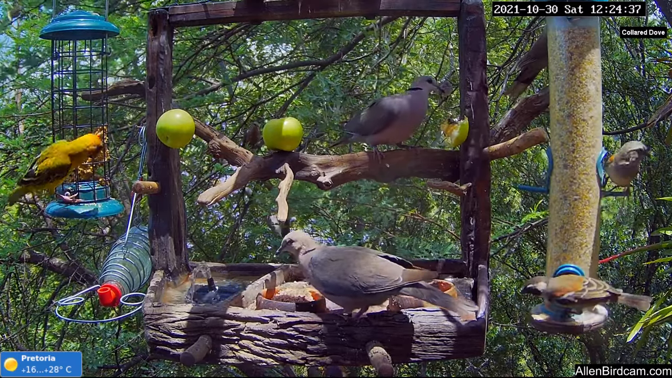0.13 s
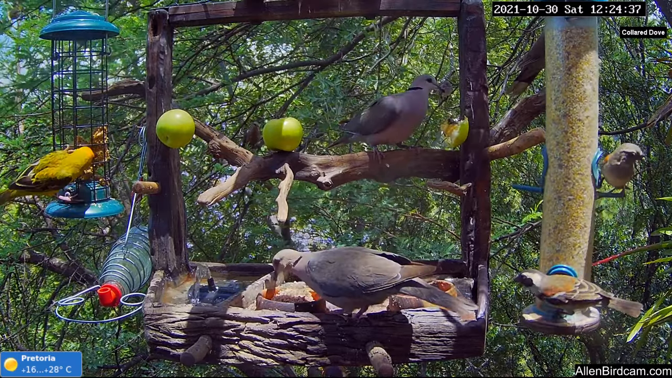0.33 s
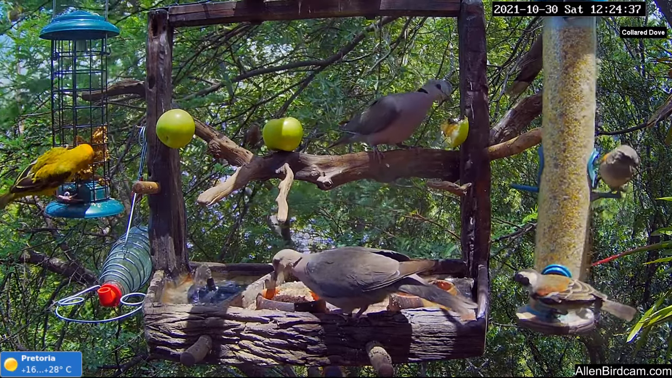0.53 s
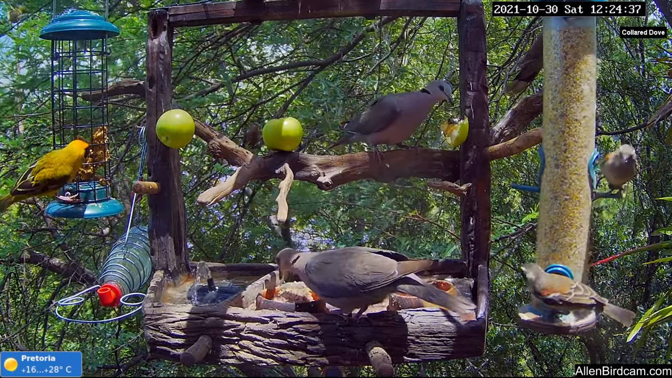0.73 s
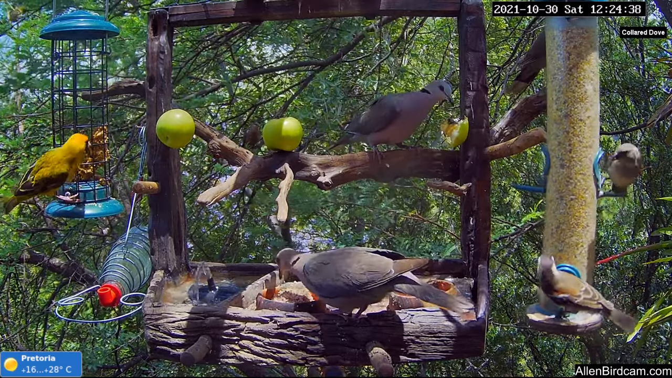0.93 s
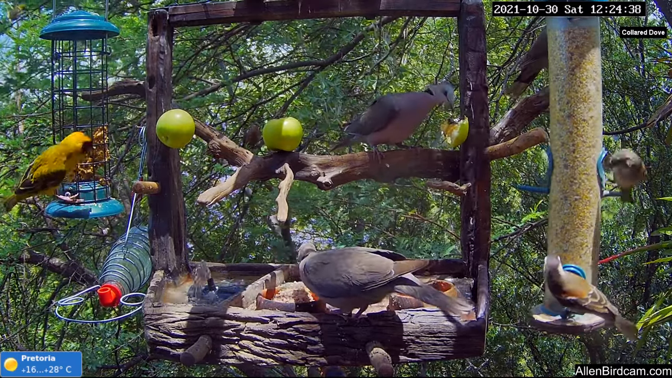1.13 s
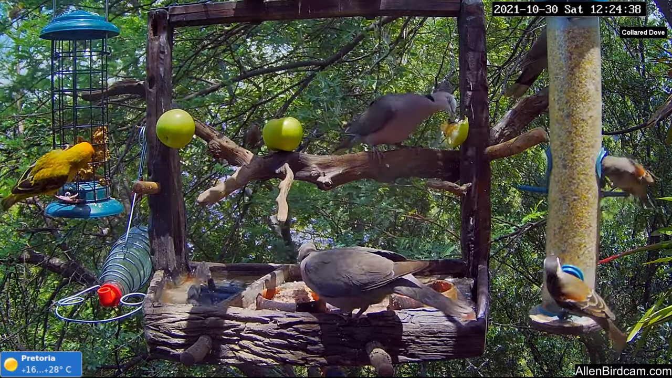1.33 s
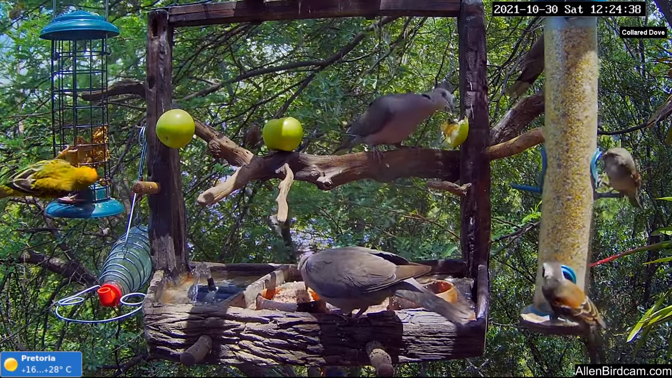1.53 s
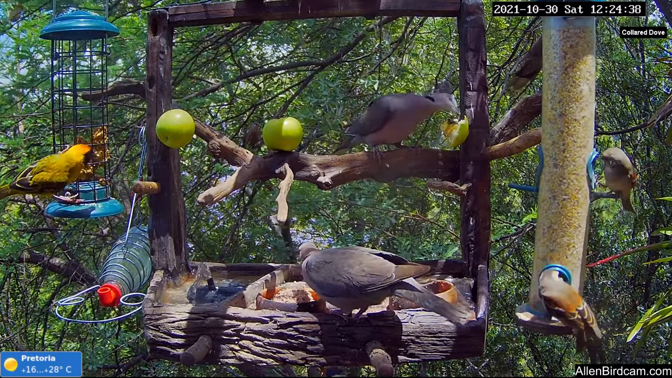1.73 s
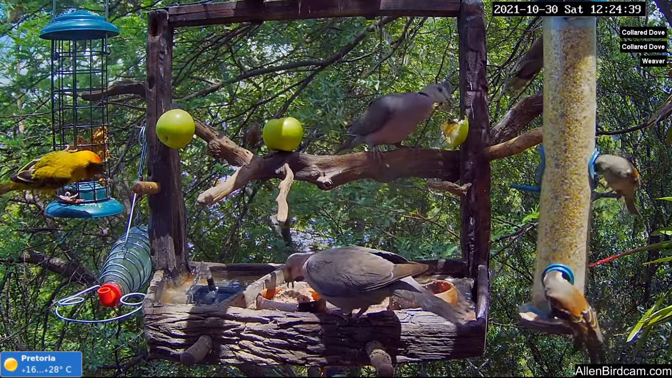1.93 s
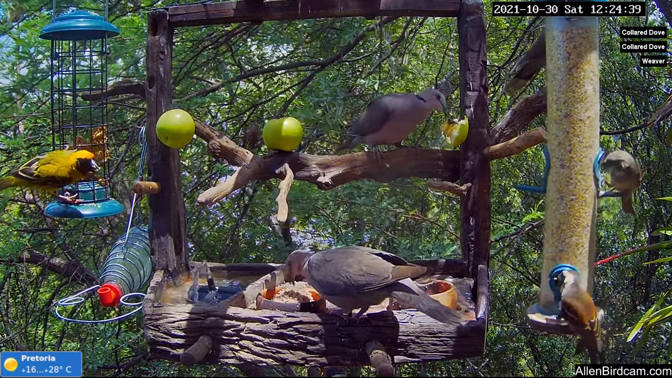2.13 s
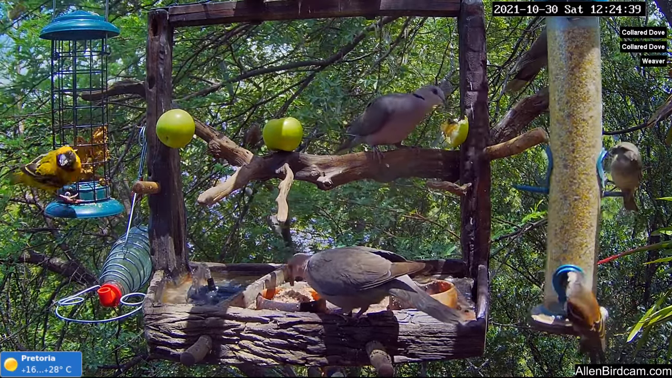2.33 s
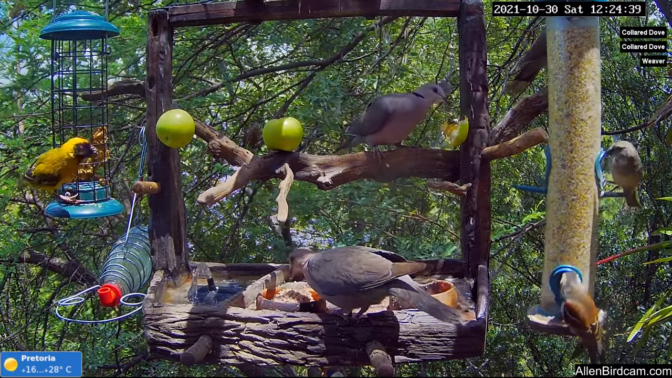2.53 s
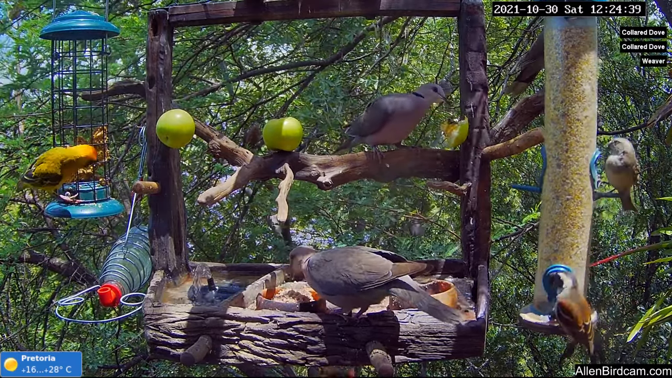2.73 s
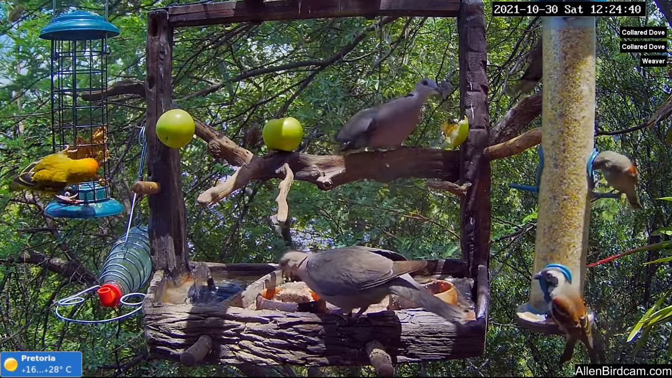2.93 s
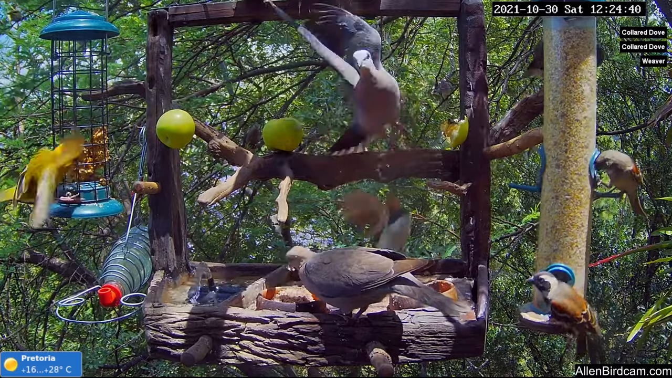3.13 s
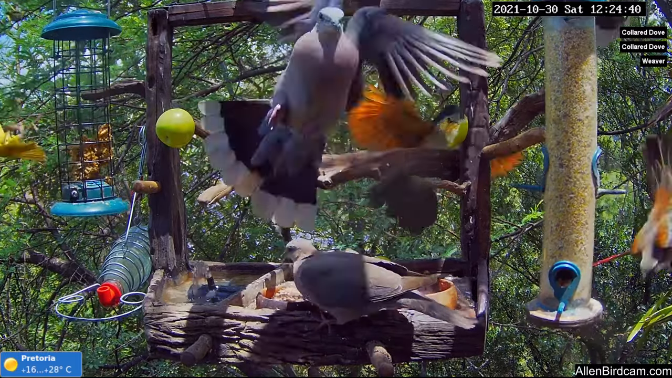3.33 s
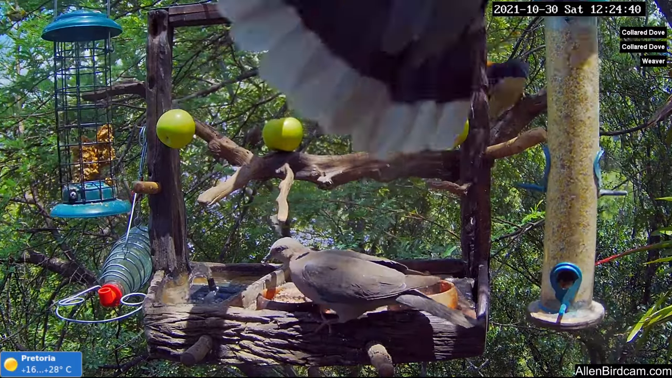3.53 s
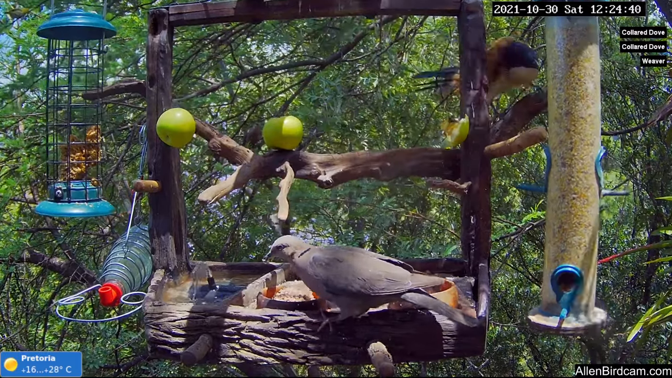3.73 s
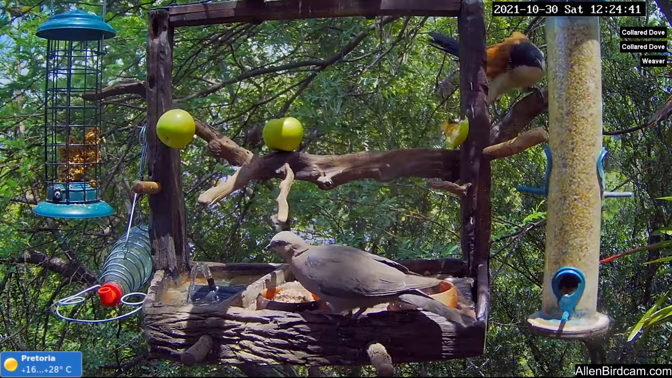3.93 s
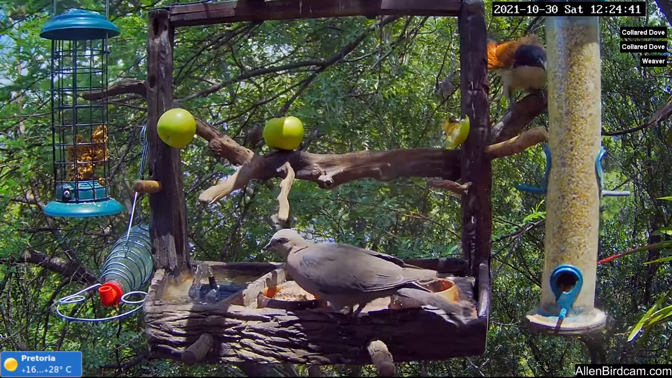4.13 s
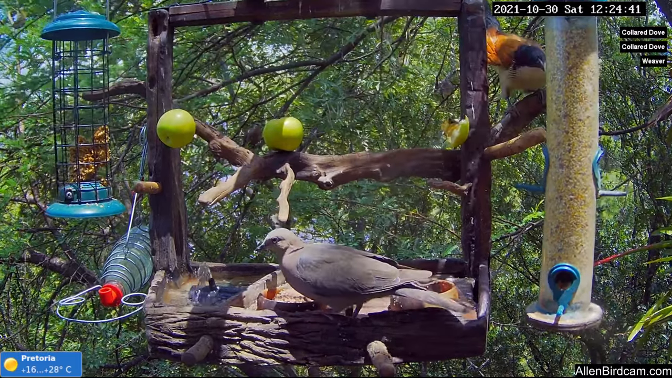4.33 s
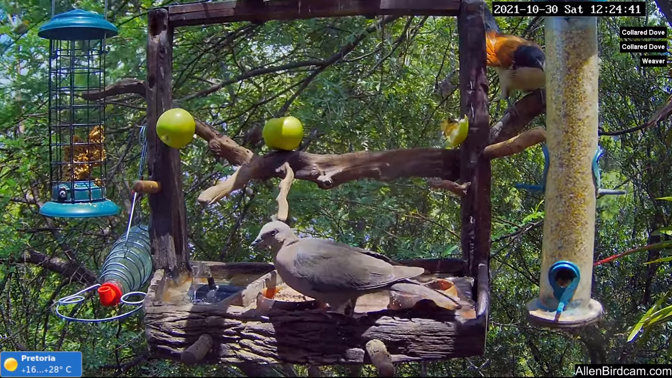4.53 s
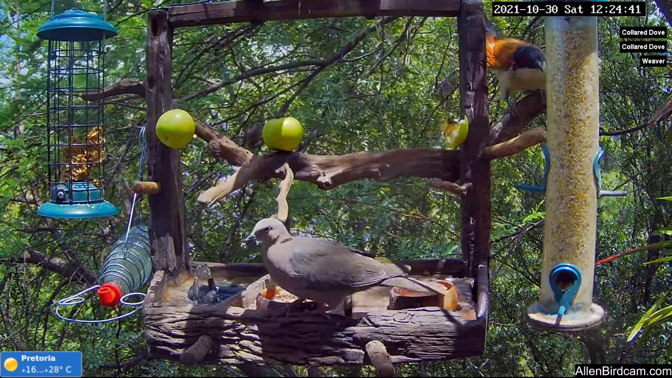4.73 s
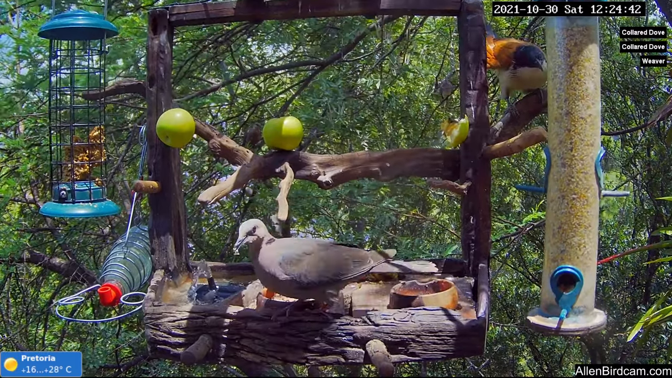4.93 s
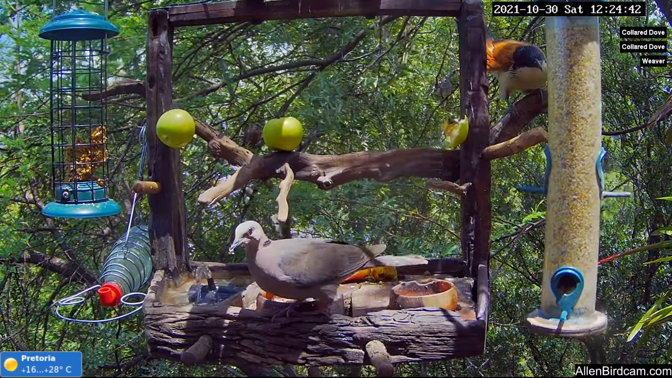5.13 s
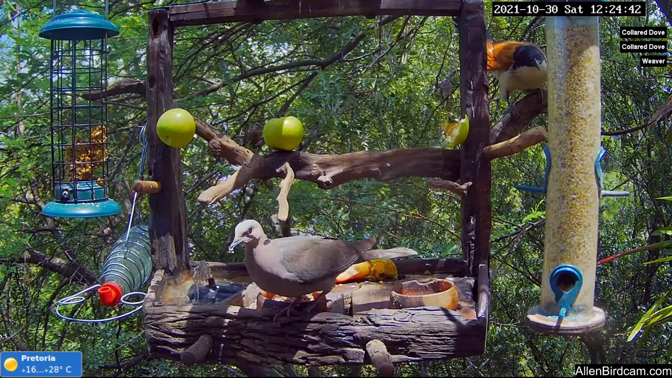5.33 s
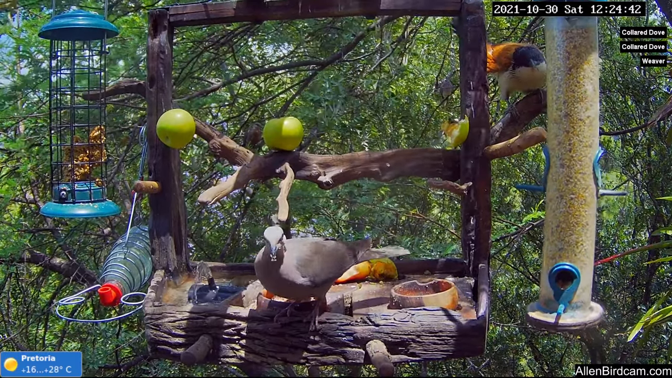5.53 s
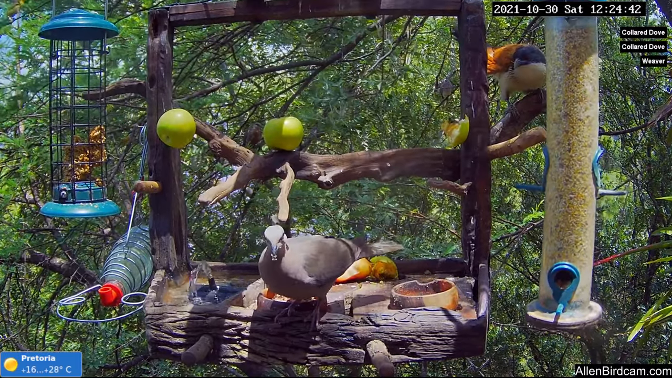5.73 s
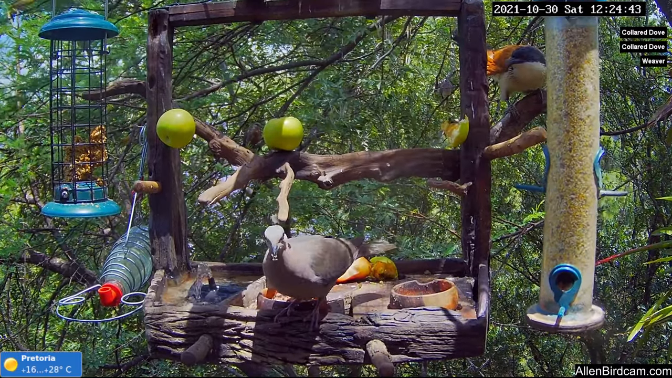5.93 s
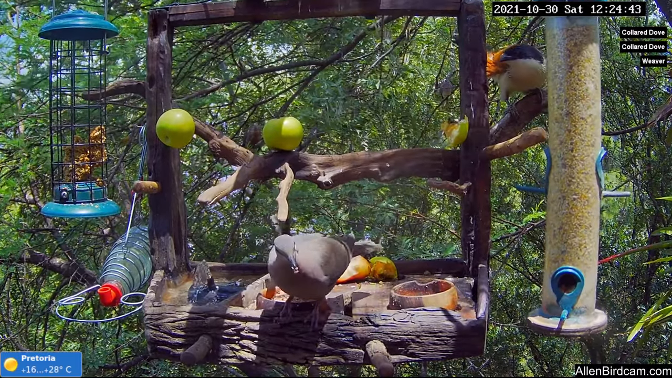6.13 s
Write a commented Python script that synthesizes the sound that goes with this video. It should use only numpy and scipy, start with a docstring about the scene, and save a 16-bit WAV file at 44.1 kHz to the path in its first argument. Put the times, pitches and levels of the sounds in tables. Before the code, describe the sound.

Beaks crack seed at a garden feeder, then birds burst away in clapping, whooshing wingbeats that thump the microphone, leaving pecks and faint chirps.

```python
"""A garden feeder: beaks crack seed and tap the tray over a light breeze on the microphone and far traffic.
The flock bursts off in whooshing, rustling, clapping noise; a dove passes so close that its wing eddies,
two-sided pressure swings, overload the converter. Birds whistle (gliding sines) and scold
(sines roughened at half their pitch, with breath noise). Echoes are noise tails.
"""
import sys
import numpy as np
from scipy import signal
from scipy.fft import rfft, irfft, next_fast_len
from scipy.io import wavfile
from scipy.ndimage import uniform_filter1d, map_coordinates

SR = 44100
rng = np.random.default_rng(int(sys.argv[2]) if len(sys.argv) > 2 else 0)


def wrap_up_sound(samples):
    """Save the sound to the file named by the first command line argument, as 16-bit audio."""
    columns = np.atleast_2d(samples).T
    # keep every value between -1 and 1, then stretch to whole-number steps
    tamed = np.clip(columns, -1, 1)
    steps = np.round(tamed * 32767).astype(np.int16)
    wavfile.write(sys.argv[1], SR, steps)


N = 273420
T = np.arange(N) / SR


def pecks():
    """A cracked husk rings in the modes nearest its brightest pitch; ticks are dry; taps ring the tray."""
    # beaks cracking seed: start_s, peak_db, brightest_hz
    crack_rows = [(0.2795, -50.5, 9700), (0.5091, -49, 5500), (0.519, -34.5, 5970), (0.6968, -53, 5640),
                  (0.9857, -47.5, 7300), (1.1452, -51, 6750), (1.4391, -44.5, 5500), (1.467, -58, 4880),
                  (1.726, -56, 6800), (1.9093, -43, 5700), (2.0027, -57, 7900), (2.3835, -50, 6200),
                  (2.4452, -30, 6370), (2.5401, -58.5, 5963), (2.6093, -55, 5600), (2.9974, -48, 7000),
                  (3.2532, -47.5, 9000), (4.0108, -48.5, 5240), (4.1173, -48.5, 7340), (4.6808, -47, 5100),
                  (4.744, -57, 4200), (4.8406, -55.5, 5730), (4.9503, -56.5, 4720), (5.074, -54.5, 6800),
                  (5.2974, -39.5, 7900), (5.6255, -17.5, 6230)]
    # husk modes: mode_hz, relative_db
    husk_modes = [(4300, 9), (5350, 13), (6300, 6.5), (7000, 8), (7800, 4), (9400, -0.5), (11500, -12.5)]
    # seeds and husks ticking on the boards: start_s, peak_db
    tick_rows = [(0.8, -54), (1.0705, -54), (1.0894, -62), (1.3877, -60), (2.2098, -60), (4.9036, -56.5),
                 (5.439, -56), (5.8155, -55), (5.946, -62)]
    # beaks and feet on the tray: start_s, ring_hz, level_db
    tap_rows = [(.3, 1090, -53), (.665, 716, -41.5), (2.91, 586, -46.5), (3.246, 1100, -48),
                (4.217, 2680, -53), (4.412, 748, -41), (4.693, 2280, -48.5), (5.815, 2420, -58)]
    # brittle click kernel, brightest near 6 kHz: amplitude per sample
    click_kernel = np.array([1, 3, 2, -2, -3, -1]) / 5
    husk_t60_s, give_way_s, tick_t60_s = 0.012, 0.00099, 0.0025

    out, t = np.zeros(N), T[:SR // 10]
    # distant beaks patter at random: start_s, peak_db, brightest_hz
    faint = rng.random((150, 3)) * [N / SR, 10, 5000] + [0, -78, 4500]
    for s, peak_db, bright_hz in [*crack_rows, *faint]:
        chance = rng.standard_normal(len(husk_modes) + 64)
        ring = np.zeros(len(t))
        for (hz, mode_db), level_chance, pitch_chance in zip(husk_modes, chance, chance[::-1]):
            octaves_off = np.log2(hz / bright_hz)
            gain = amp(mode_db + 2.5 * level_chance - 65 * octaves_off ** 2)
            ring += gain * np.sin(2 * np.pi * hz * (1 + .045 * pitch_chance) * t)
        ring *= amp(-60 * t / husk_t60_s) * np.tanh(t / give_way_s) ** 2
        snap = np.convolve(chance[-64:], click_kernel, 'same') * np.hanning(64)
        ring[:64] += 0.13 * snap
        add(out, s, amp(peak_db) * ring / np.abs(ring).max())

    # random ticks: start_s, peak_db
    stray = rng.random((120, 2)) * [N / SR, 10] + [0, -72]
    for s, peak_db in [*tick_rows, *stray]:
        burst = rng.standard_normal(64) * amp(-60 * t[:64] / tick_t60_s)
        tick = np.convolve(burst, click_kernel)
        add(out, s, amp(peak_db) * tick / np.abs(tick).max())

    for s, hz, level_db in tap_rows:
        decay = amp(level_db - 60 * t * hz / 40)  # 60 dB in 40 cycles
        add(out, s, decay * np.sin(2 * np.pi * hz * t) * (1 - np.exp(-t * hz / 1.1)))
    return out


def wings():
    """Air whooshes through the wings stroke by stroke, feathers rub in quick grains, tips and feet strike."""
    # beating wings, before common trims: time_s, whoosh_db, rustle_db
    beat_rows = [(3.03, -73, -85.5), (3.32, -63.5, -77), (3.4, -39.5, -57), (3.48, -38, -55),
                 (3.57, -34.5, -50), (3.68, -40, -53), (3.75, -43, -54), (3.9, -51, -61),
                 (4.08, -65.5, -86)]
    # wing tips and feet striking, before common trims: start_s, level_db, thud_relative_db, length_s
    clap_rows = [(3.265, -52, 8, 0.059), (3.35, -58, 18, 0.021), (3.508, -30.5, 5, 0.049),
                 (3.668, -25.5, 12, 0.022), (4.02, -50.5, 9.5, 0.053), (3.396, -45.5, 31, 0.014),
                 (3.4157, -24, 3.5, 0.016), (3.456, -15, 4, 0.045), (3.5318, -20.5, -5, 0.022),
                 (3.6247, -26, 6.5, 0.031), (3.7768, -22, 12, 0.016), (3.867, -26.5, -0.5, 0.043)]
    # air through the wings: freq_hz, relative_db_per_hz
    whoosh_spectrum = [(88, -48.5), (150, -14.5), (264, 0), (487, -6), (653, -5.5), (837, -9),
                       (2500, -32.5), (3250, -80), (5500, -120)]
    # feather friction: freq_hz, relative_db_per_hz
    rustle_spectrum = [(1060, -31), (1800, -3.5), (2140, -20), (2720, -6.5), (6350, -3), (11200, -14.5),
                       (15500, -48)]
    # the dove's steady stroke
    downstroke_s, strokes_per_s, stroke_db = 3.675, 9.53, 3.5

    flying = np.clip(np.minimum(T - beat_rows[0][0], beat_rows[-1][0] - T) / 0.0089, 0, 1)
    whoosh_db, rustle_db = curves(beat_rows)
    whoosh_db = whoosh_db + stroke_db * np.cos(2 * np.pi * strokes_per_s * (T - downstroke_s))
    strokes = wobble(45)  # many small wings out of step
    whoosh = rush(whoosh_spectrum, lumps_db=2.5, rate=70)
    rustle = patchy(rush(rustle_spectrum, lumps_db=2.5, rate=200), depth_db=3.5)
    out = amp(whoosh_db - 3.0 + 1.13 * strokes) * whoosh
    out += amp(rustle_db + 1.5 * strokes) * rustle

    thud = rush(whoosh_spectrum, lumps_db=1, rate=110)
    snap = patchy(rush(rustle_spectrum, lumps_db=2.0, rate=530), depth_db=2.5)
    snap_level, thud_level, t = np.zeros(N), np.zeros(N), T[:SR // 8]
    for s, db, thud_db, length in clap_rows:
        # a longer strike also swells more slowly
        add(snap_level, s, amp(db - 10.0 - 60 * t / length) * np.tanh(t / (1.4 * length ** 2)))
        thud_decay = amp(thud_db - 60 * t / (1.25 * length) + db - 5.0)
        add(thud_level, s, thud_decay * (1 - np.exp(-t / 0.0032)))
    return out * flying + snap_level * snap + thud_level * thud


def air():
    """Slow turbulence on the microphone, and two-sided pressure swings as wing eddies roll past."""
    # breeze: time_s, level_db
    breeze_rows = [(0, -36), (.3, -41.5), (.5, -30.5), (.9, -40), (1.5, -42), (1.85, -39.5), (2.25, -35),
                   (2.55, -33.5), (2.85, -48), (4.2, -34), (4.42, -35), (4.75, -41), (5.1, -44.5),
                   (5.6, -52.5), (6.2, -53.5)]
    # turbulence: freq_hz, relative_db_per_hz
    gust_spectrum = [(3.5, -36.5), (6.0, 7.5), (19, -3.5), (37, -13.5), (67, -9.5), (118, -27),
                     (250, -40.5), (320, -55), (550, -120)]
    # passing eddies: centre_s, peak_before (full scale 1), core_before_s, peak_after, core_after_s
    eddy_rows = [(3.6735, .95, .0095, -.8, .014), (3.707, -.05, .01, .24, .013),
                 (3.7828, -.9, .012, 1.9, .015), (3.803, .1, .01, -.3, .034)]
    # the dove's downwash: strongest from-to, with straight dB slopes either side
    wash_peak_db, from_s, to_s, builds_db_per_s, dies_db_per_s = -23, 3.5, 3.91, 37, 63

    under_db = np.maximum(builds_db_per_s * (from_s - T), dies_db_per_s * (T - to_s))
    wash_db = wash_peak_db - np.maximum(0, under_db)
    level = np.hypot(amp(curves(breeze_rows)[0]), amp(wash_db))
    out = level * rush(gust_spectrum, lumps_db=2.0, rate=15)
    for s, before, core_before, after, core_after in eddy_rows:
        u = np.abs(T - s) / np.where(T < s, core_before, core_after)
        swing = u / (1 + u * u) ** 3 * 216 / 25 / np.sqrt(5)  # peaks at 1
        out += np.where(T < s, before, after) * swing
    return out


def songs():
    """Gliding whistles: notes and falls tremble in level; songs pass a beak; all but falls echo."""
    # whistled notes: start_s, length_s, from_hz, to_hz, mid_bow_hz, peak_rms_db, peak_at_share
    note_rows = [(0.242, 0.15, 3770, 3290, 0, -88, 0.64), (0.329, 0.22, 2633, 2642, 108, -63, 0.098),
                 (2.229, 0.024, 4310, 4370, 0, -68, 0.51), (2.239, 0.026, 5960, 5900, -1, -59, 0.74),
                 (2.277, 0.028, 7470, 7360, 0, -63.5, .5), (2.257, 0.043, 5570, 4140, 98, -54, 0.87),
                 (2.3, 0.041, 3950, 3550, 30, -68.5, .4), (3.017, 0.11, 5260, 5200, 102, -72.5, .3),
                 (3.133, 0.082, 4820, 4520, -120, -58.5, 0.45), (5.191, 0.37, 5860, 5840, -1.5, -91, .4),
                 (5.611, 0.17, 3064, 3080, -1, -69, .2), (5.99, 0.044, 5430, 4320, -160, -68, 0.65)]
    # firm falling whistles close by as the flock leaves: start_s, length_s, from_hz, to_hz,
    # mid_bow_hz, peak_rms_db, peak_at_share
    fall_rows = [(3.577, .161, 5320, 2500, 398.5, -38, 0.14), (3.634, .126, 5600, 1600, -480, -43, .5),
                 (3.706, 0.053, 6050, 3760, 152, -45.5, .3), (3.65, 0.0342, 1080, 620, 110, -35.5, 0.86)]
    # one song, before beak and song level: start_s from its arch, length_s, from_hz, to_hz,
    # mid_bow_hz, peak_db, peak_at_share
    song_rows = [(-.083, 0.066, 2375, 1920, -31, -60.5, 0.28), (-.019, 0.022, 1850, 1820, -4, -63, 0.5),
                 (-.003, .073, 1950, 1870, 1072.5, -37, .55), (.068, .065, 1900, 1890, -590, -43.5, 0.22)]
    # songs: arch_s, level_db, silent_after_s from the arch
    song_times = [(2.83, -4.5, 0.0993), (4.256, 1.5, 0.161)]
    # open beak favouring a narrow range: freq_hz, gain_db
    beak_gain = [(1300, -29.5), (2100, -14), (2900, -3), (3700, -3.5), (4200, -29), (6000, -65)]
    # breathy puff as the arch begins
    puff_hz, puff_octaves, puff_s, puff_db = 4650, 0.17, 0.025, -64
    call_echo_db, song_echo_db = -2, -9  # the singer is nearer than the other callers
    waver = 0.015  # pitch unsteadiness as a share, before smoothing

    out, tremble = np.zeros(N), amp(5.1 * wobble(110))

    def shaky(s, call, share=1):
        """The call's level follows the shared random tremble."""
        return call * tremble[round(s * SR):][:len(call)] ** share

    def puff_band(hz):
        """A bell-shaped band on a log frequency axis."""
        return amp(-10 * (np.log2((hz + 1) / puff_hz) / puff_octaves) ** 2)

    calls = []
    for row in note_rows:
        note = whistle(contour(*row, waver=waver), smooth_s=0.0018)
        calls.append((row[0], shaky(row[0], note), call_echo_db))
    for s, db, stop in song_times:
        for row in song_rows:
            part = whistle(contour(*row, fade_db=10.5), smooth_s=.002, beak=beak_gain)
            break_off = np.clip((stop - row[0] - T[:len(part)]) / 0.017, 0, 1)
            calls.append((s + row[0], amp(db) * part * break_off, song_echo_db))
        breath = filtered(rng.standard_normal(round(puff_s * SR)), puff_band)
        puff = amp(db + puff_db) * unit(breath) * np.hanning(len(breath))
        calls.append((s, puff, call_echo_db))
    for s, call, echo_db in calls:
        padded = np.pad(call, (0, SR // 2))
        add(out, s, padded + amp(echo_db) * echo(padded, size=1.4))
    for row in fall_rows:
        fall = whistle(contour(*row, waver=waver, fade_db=13), smooth_s=.004)
        add(out, row[0], shaky(row[0], fall, share=.9))
    return out


def scolds():
    """With effort every other cycle of the syrinx weakens, adding lines at half the pitch; breath roughens it."""
    # one harsh scold: time_s after start, pitch_hz, relative_db
    scold_rows = [(0, 2900, -30), (.013, 2950, -16), (.018, 2000, -16), (.026, 2400, -1), (.035, 3650, 5),
                  (.043, 2200, 0), (.055, 2800, -2), (.063, 2250, -6), (.075, 3500, -8)]
    # scolds: start_s, level_db
    scold_times = [(4.531, -42), (6.043, -42.5)]
    # breath hissing in the throat: freq_hz, relative_db_per_hz
    breath_spectrum = [(1100, -40), (2300, -1), (3700, 5.5), (4900, -3), (5700, -16.5), (7400, -29),
                       (11000, -49)]

    out, effort, pitch_hz = np.zeros(N), np.zeros(N), np.zeros(N)
    for s, db in scold_times:
        call = whistle(scold_rows, smooth_s=0.0022)
        t = T[:len(call)]
        add(out, s, amp(db) * call)
        add(effort, s, np.clip(t / .018, 0, 1) ** 2)
        add(pitch_hz, s, uniform_filter1d(curves(scold_rows, t)[0], round(0.0041 * SR)))
    half_pitch_phase = np.pi * np.cumsum(pitch_hz + 120 * wobble(160)) / SR
    chop = np.cos(half_pitch_phase) * amp(1.0 + 3 * wobble(220))
    rough = out * (1 + effort * chop)

    def throat(hz):
        """Passes the middle: weak below 1700 Hz and above 5800 Hz."""
        return 1 / (1 + (1700 / (hz + 1)) ** 6) / (1 + (hz / 5800) ** 4)

    push = np.sqrt(np.abs(uniform_filter1d(out ** 2, round(0.0097 * SR))))
    breath = patchy(rush(breath_spectrum, lumps_db=2, rate=300), depth_db=4)
    rough = filtered(rough, throat) + amp(-2) * push * effort * breath
    return rough + amp(-8.5) * echo(rough, size=1.2)


def garden():
    """Far traffic as lumpy low noise over a steady leaf and microphone hiss; a faint whine and hum waver."""
    # far drone: time_s, level_db
    drone_rows = [(0, -48.5), (.45, -55), (1.55, -55), (1.9, -56), (2.9, -57.5), (3.25, -51), (4.4, -56.5),
                  (4.8, -57), (6.2, -57)]
    # far traffic: freq_hz, relative_db_per_hz
    drone_spectrum = [(71, -16), (120, 0.5), (146, -5.5), (296, 1), (423, -12), (677, -8.5), (815, -17),
                      (1030, -17.5), (1610, -28), (2300, -46.5), (2990, -72), (5060, -120)]
    # leaf and microphone hiss: freq_hz, relative_db_per_hz
    hiss_spectrum = [(1200, -21.5), (2300, -3.5), (5000, -2), (7000, -7.5), (15500, -13.5)]

    whine = amp(-83.0 + 2.7 * wobble(2.93)) * np.sin(2 * np.pi * 1650 * T + 2.5 * wobble(15))
    mains_hum = amp(-70.5 + 3 * wobble(1.8)) * np.sin(2 * np.pi * 101.5 * T + wobble(3.6))
    hiss = amp(-85.0) * rush(hiss_spectrum, lumps_db=.3, rate=9)
    drone = amp(curves(drone_rows)[0]) * rush(drone_spectrum, lumps_db=2.0, rate=12)
    return drone + hiss + whine + mains_hum


def echo(x, size=1):
    """Trees and walls answer with a noise tail, each frequency dying at its own speed; size scales its length."""
    # decay at size 1: freq_hz, t60_s
    decay_rows = [(300, 0.1), (3000, 0.14), (6000, 0.15), (12000, 0.11)]
    hz, t, z = signal.stft(rng.standard_normal(SR // 2), SR, nperseg=256)
    t60_s = along(decay_rows, hz)[:, None]
    tail = signal.istft(z * amp(-60 * t / size / t60_s), SR, nperseg=256)[1]
    delayed = np.pad(x, (130, 0))  # 130 samples, 2.9 ms
    return signal.fftconvolve(delayed, tail / np.linalg.norm(tail))[:len(x)]


def whistle(rows, smooth_s, beak=None):
    """A gliding sine from (s, Hz, rms dB) rows, faded at both ends; through a beak it also has its octave."""
    overtone_db = -2.5
    t = np.arange(rows[0][0], rows[-1][0], 1 / SR)
    hz, root_level = curves([(s, f, amp(db / 2)) for s, f, db in rows], t)
    hz = uniform_filter1d(hz, round(smooth_s * SR))
    phase = 2 * np.pi * np.cumsum(hz) / SR
    fade = np.clip(np.minimum(t - t[0], t[-1] - t) / 0.0024, 0, 1)
    tone = np.sin(phase)
    if beak:
        octave = amp(overtone_db + along(beak, 2 * hz)) * np.sin(2 * phase)
        tone = amp(along(beak, hz)) * tone + octave
    return np.sqrt(2) * root_level ** 2 * fade * tone


def contour(s, length, from_hz, to_hz, bow_hz, db, peak, waver=0, fade_db=20):
    """(s, Hz, dB) rows of a note: a bowed glide that swells to its peak and fades to fade_db under it."""
    swell_db, fade_curve = 13, 1.02  # start under the peak; 1 = straight fade in dB
    u, peak = np.linspace(0, 1, num=33), np.clip(peak, .05, .95)
    hz = from_hz + (to_hz - from_hz) * u + bow_hz * 4 * u * (1 - u)
    hz *= 1 + waver * uniform_filter1d(rng.standard_normal(len(u)), size=3)
    swell = swell_db * (1 - u / peak) ** 2
    fade = fade_db * np.abs((u - peak) / (1 - peak)) ** fade_curve
    return np.transpose([s + length * u, hz, db - np.where(u < peak, swell, fade)])


def rush(spectrum, lumps_db, rate):
    """Coloured noise of rms 1 whose level comes in lumps."""
    noise = filtered(rng.standard_normal(N), lambda hz: amp(along(spectrum, hz)))
    return unit(noise * amp(lumps_db * wobble(rate)))


def patchy(x, depth_db):
    """Random gain patches in time and pitch, each in its own short band; rms 1."""
    z = signal.stft(x, nperseg=256)[2]
    field = uniform_filter1d(rng.standard_normal(z.shape), size=9, axis=0)
    field = uniform_filter1d(field, size=3, axis=1)
    return unit(signal.istft(z * amp(depth_db * unit(field)), nperseg=256)[1][:N])


def filtered(x, response):
    """x times a response of frequency."""
    m = next_fast_len(len(x) + 8192)
    return irfft(rfft(x, m) * response(np.fft.rfftfreq(m, 1 / SR)), m)[:len(x)]


def wobble(rate):
    """A smooth random curve, rate knots a second."""
    return map_coordinates(rng.standard_normal(int(N * rate / SR) + 4), [T * rate])


def curves(rows, t=T):
    """One value per sample for each column after the time."""
    s, *cols = np.transpose(rows)
    return [np.interp(t, s, c) for c in cols]


def along(points, hz):
    """(Hz, value) points interpolated on a log frequency axis."""
    f, v = np.transpose(points)
    return np.interp(np.log(hz + 1), np.log(f + 1), v)


def add(track, s, sound):
    """Mixes a sound in at time s."""
    part = track[round(s * SR):][:len(sound)]
    part += sound[:len(part)]


def unit(x):
    """Scaled to rms 1."""
    return x / np.sqrt(np.mean(x ** 2) + 1e-20)


def amp(db):
    """Decibels to gain."""
    return 10 ** (np.asarray(db) / 20)


def scene():
    """Everything at the microphone; the feeder's frame and boughs echo the pecks, the garden the flock."""
    near, flock = pecks(), wings()
    feeder = near + amp(-13.5) * echo(near, size=1.1)
    departure = flock + amp(-8.5) * echo(flock)
    return (feeder + departure + air() + songs() + scolds() + garden())[None]


def record(dry):
    """The converter clips the strongest push; nothing is kept above the band limit."""
    ceiling, top_hz = .953, 15700  # ceiling as a share of full scale
    clipped = np.clip(dry[0], -ceiling, ceiling)
    return filtered(clipped, lambda hz: hz < top_hz)[None]


dry = scene()
out = record(dry)
wrap_up_sound(out)
```